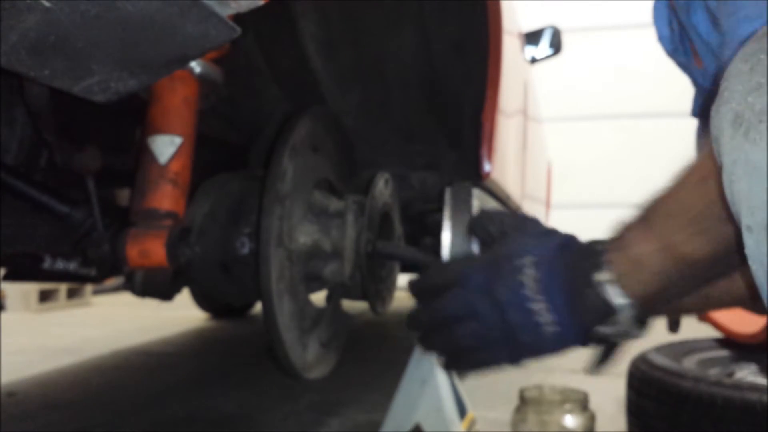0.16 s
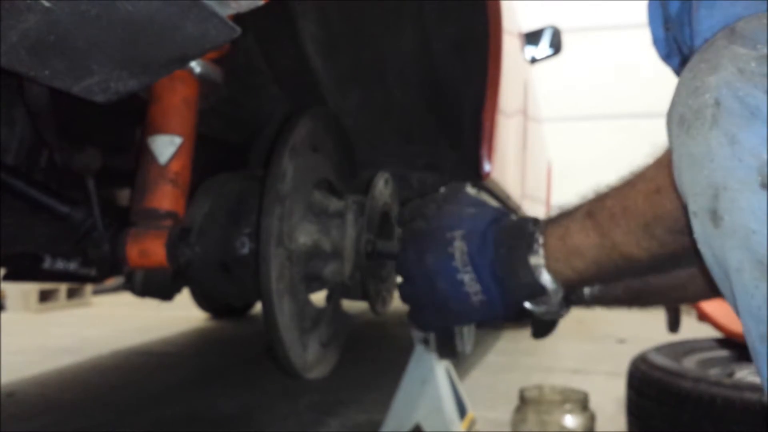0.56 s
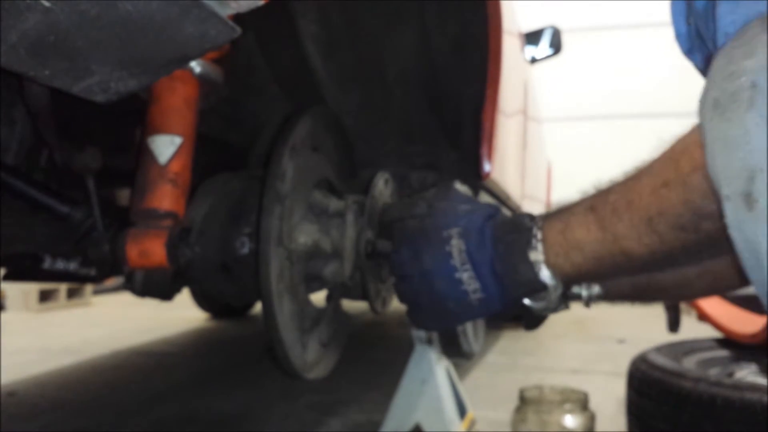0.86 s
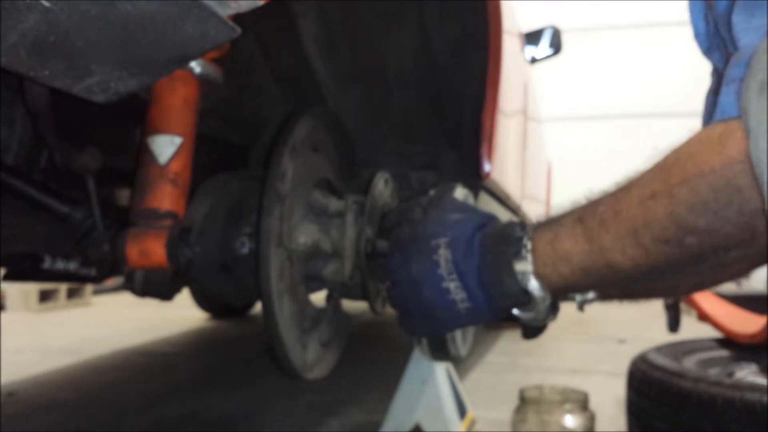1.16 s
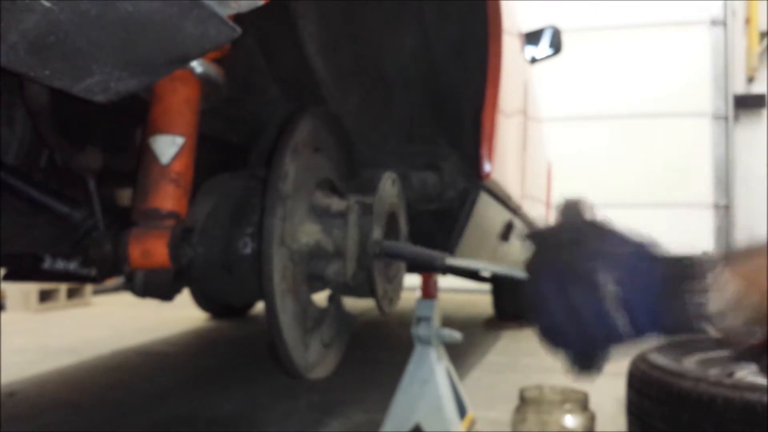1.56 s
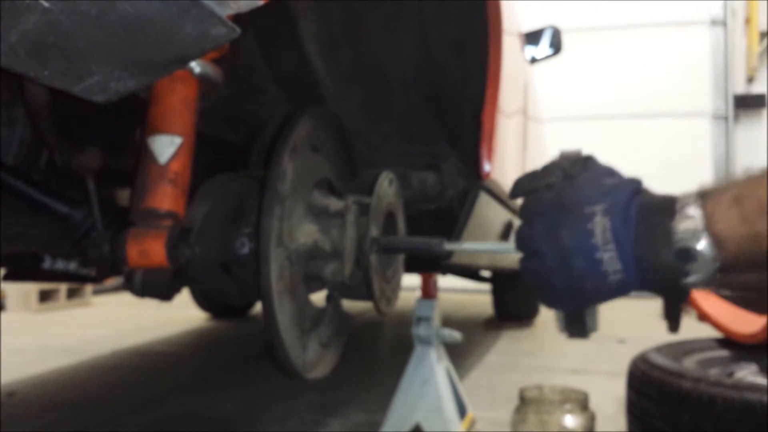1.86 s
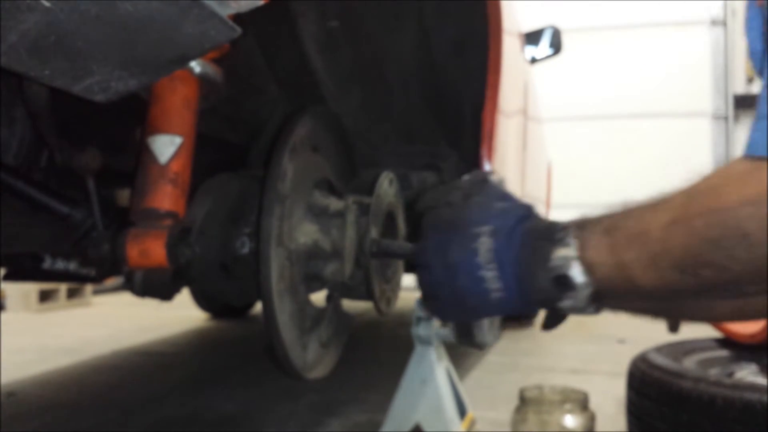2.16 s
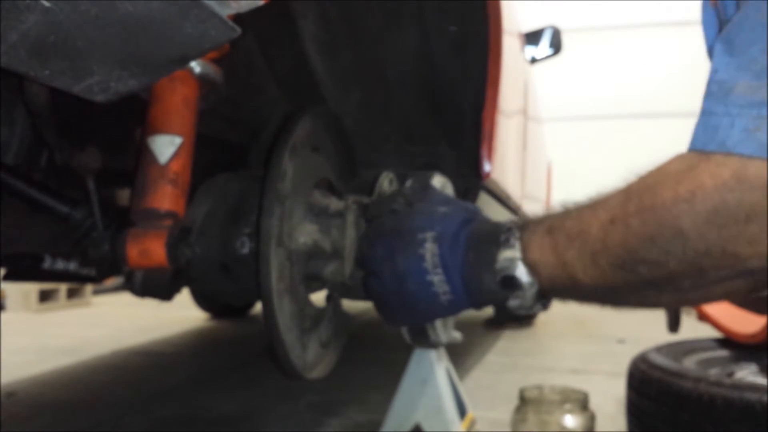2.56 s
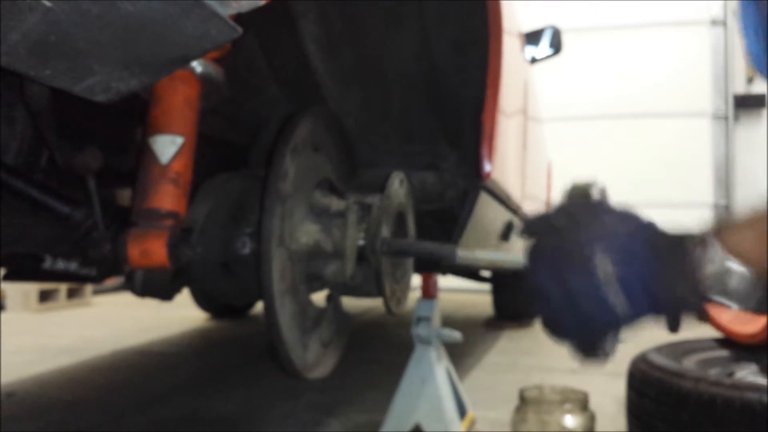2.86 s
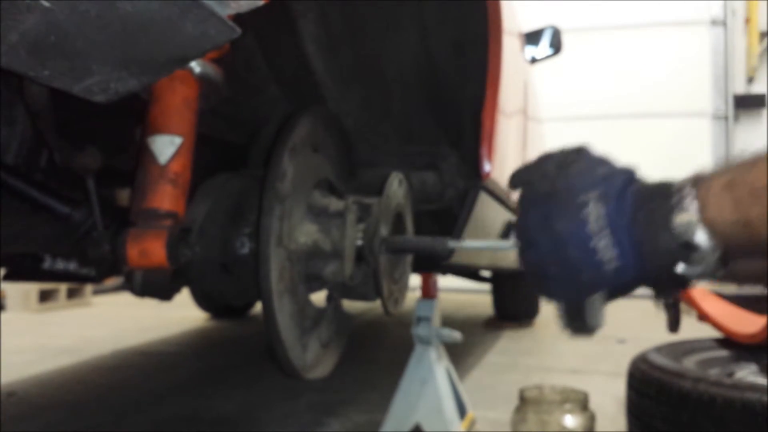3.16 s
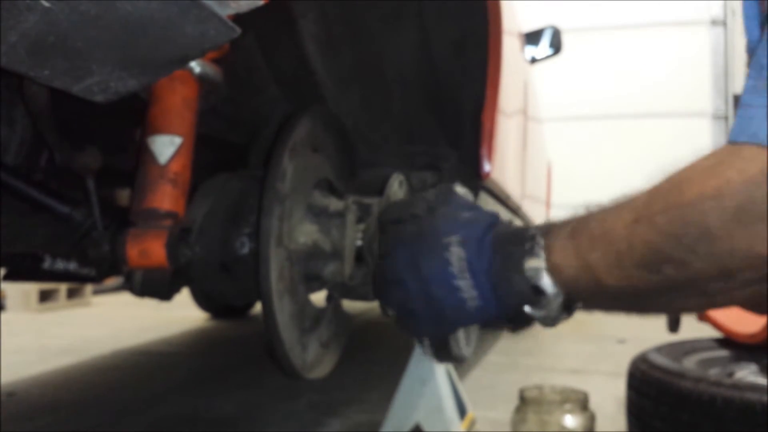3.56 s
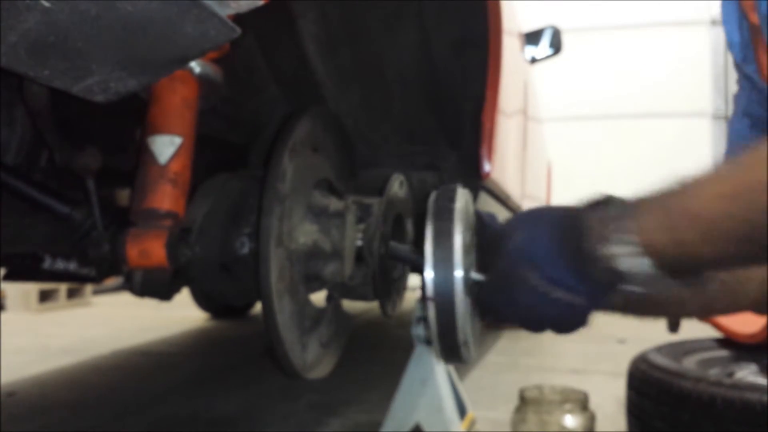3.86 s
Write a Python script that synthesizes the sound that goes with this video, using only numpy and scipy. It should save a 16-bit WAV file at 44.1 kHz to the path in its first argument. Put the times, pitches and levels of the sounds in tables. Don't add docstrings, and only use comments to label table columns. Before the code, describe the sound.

Two violent, overloaded metal-on-metal slide hammer blows, with squeaky rod scraping between them, ringing hub and boomy garage reverberation.

```python
import sys
import numpy as np
from scipy import signal
from scipy.fft import rfft, irfft, next_fast_len
from scipy.io import wavfile
from scipy.ndimage import uniform_filter1d

SR = 44100
rng = np.random.default_rng(int(sys.argv[2]) if len(sys.argv) > 2 else 0)


def dump_mix(stems):
    frames = np.atleast_2d(stems).T
    limited = np.clip(frames, -1, 1)
    pcm = np.round(limited * 32767).astype(np.int16)
    wavfile.write(sys.argv[1], SR, pcm)


def makeup_ratio(level_db):
    decades = np.asarray(level_db, float) / 20
    return 10 ** decades


N = 177634
LEAD = SR // 2

# frequency in Hz, width in Hz, level in dB.
ROD = [(1413.6, 26, -15.5), (3207, 58, -13.5), (4724, 35, -6), (4946, 47, -10), (5500, 120, -17),
       (6534, 60, -0.5), (7617, 45, -0.5), (8548, 36, -2.5), (9940, 8.6, 0.5), (10960, 35, -11),
       (13526, 44, -12.5), (13880, 29, -24.5), (14000, 39, -26.5), (13900, 23, -19.5)]


def evened(x):
    return x / np.sqrt(np.mean(x ** 2) + 1e-20)


def read(points, hz):
    f, value = np.transpose(points)
    return np.interp(np.log(hz + 1), np.log(f + 1), value)


def colour(x, points, scale=1):
    size = next_fast_len(x.shape[-1])
    gain = makeup_ratio(scale * read(points, np.fft.rfftfreq(size, 1 / SR)))
    return irfft(rfft(x, size) * gain, size)[..., :x.shape[-1]]


def resonate(x, hz, width_hz):
    pole = np.exp((2j * np.pi * hz - np.pi * width_hz) / SR)
    return 2 * signal.lfilter([1 - abs(pole)], [1, -pole], x + 0j).real


def drift(size, span_s):
    span = int(span_s * SR)
    return evened(uniform_filter1d(uniform_filter1d(rng.standard_normal(size), span), span))


def alike(hz, like):
    return like + (.98 - like) / (1 + (hz / 560) ** 3)


def pair(size, like):
    a, b = rfft(rng.standard_normal((2, size)))
    same = np.clip(alike(np.fft.rfftfreq(size, 1 / SR), like), -1, 1)
    return irfft([a, same * a + np.sqrt(1 - same ** 2) * b], size)


def add(mix, s, sound, pan_db=0):
    part = mix[:, LEAD + round(s * SR):][:, :sound.shape[-1]]
    panned = sound * makeup_ratio(np.array([[pan_db / 2], [-pan_db / 2]]))
    part += panned[:, :part.shape[1]]


def add_both(near, sent, s, sound):
    add(near, s, sound)
    add(sent, s, sound * makeup_ratio(-3.5))


def shock(shape):
    x = pair(len(shape), 0.24) * shape
    for _ in range(4):
        z = rfft(x)
        x = irfft(z / (abs(z) + 1e-12), len(shape))
        x = x * shape / np.sqrt(abs(uniform_filter1d(x ** 2, 48)) + 1e-24)
    return x


def blow(strength_db, rise_s, spectrum, ring):
    ring_db = -5
    t = np.arange(SR // 2) / SR
    t60_s = 0.07 * makeup_ratio(0.1 * strength_db) + 4.4 * rise_s
    hold_s = .015 * makeup_ratio(0.2467 * strength_db)
    onset = np.minimum(t / rise_s, 1)
    burst = shock(makeup_ratio(-60 * np.maximum(t - hold_s, 0) / t60_s) * onset)
    modes = sum(makeup_ratio(db) * resonate(burst * onset, hz, 2 * width_hz) for hz, width_hz, db in ring)
    crunch = colour(burst, spectrum) * onset
    sound = evened(crunch) + makeup_ratio(ring_db) * evened(modes)
    return makeup_ratio(strength_db) * 0.0867 * sound * np.minimum(1, 10 - 20 * t)


def boom(strength_db):
    # frequency in Hz, t60 in seconds, level in dB.
    body = [(52.1, 0.27, -6.5), (78, 0.35, -13), (99.8, 0.3, -6), (149.9, 0.65, -3.5), (173, 0.55, -9),
            (255.7, 0.23, -1), (274.3, 0.57, -13)]
    level_db = -28.5 + 1.4341 * min(strength_db, -4.5)
    t = np.arange(SR) / SR
    push = rng.standard_normal(SR) * makeup_ratio(-60 * t / 0.81) * np.minimum(t / 0.033, 1)
    panels = 0
    for hz, t60_s, db in body:
        panel = evened(resonate(push, hz, 0.9 / t60_s + 16))
        panels = panels + makeup_ratio(db) * panel * makeup_ratio(-30 * t / t60_s)
    return makeup_ratio(level_db) * evened(panels)[None] * np.ones((2, 1))


def blows(near, sent):
    # start in seconds, strength in dB, rise in seconds, left-right in dB, echo in dB.
    impacts = [
        (-.28, -3.5, 0.00286, 4.5, 0.5),
        (1.101, -39, 0.01594, 1, -1.5),
        (1.6455, -24.5, 0.0047, -0.5, -35.5),
        (1.6945, 3, 0.00512, 2.5, -3.5),
        (2.9826, -6.5, 0.0009, 2.5, 3),
        (3.671, -28.5, 0.0035, 1, -2),
    ]
    # frequency in Hz, level in dB per Hz.
    early = [(59, -28.5), (100, -8), (199, 2), (356, -13.5), (575, -12.5), (665, -65), (1100, -21),
             (2420, -8.5), (3590, -42.5), (6300, -4.5), (14500, -89)]
    scuff = [(88, -31.5), (150, -4.5), (216, -11), (270, 1), (355, -9), (494, -1.5), (1460, -14.5),
             (1850, -19.5), (12000, -39.5), (15600, -78), (22000, -120)]
    click = [(230, -29.5), (330, -5.5), (1010, -16.5), (1380, -4.5), (4020, -16), (8630, -6.5), (9360, -21),
             (14500, -21.5)]
    first = [(71, -38.5), (120, -19.5), (238, -6.5), (300, -20), (420, 0.5), (719, -11.5), (828, -3.5),
             (915, -14), (1070, -6), (4480, -11), (5590, -2), (10400, -22.5), (14700, -47.5)]
    second = [(71, -34.5), (120, -13.5), (162, -9), (810, -11.5), (890, -20), (1100, -5.5), (1200, -13.5),
              (2770, -11.5), (3540, -17.5), (5070, -11.5), (5780, -4.5), (10200, -20.5), (11000, -45),
              (14300, -55), (22000, -120)]
    clunk = [(120, -26), (200, -1), (714, -13), (824, -9), (1490, -11.5), (3160, -22), (4360, -32.5),
             (5510, -16), (8470, -25), (10900, -46), (14500, -35)]
    # frequency in Hz, width in Hz, level in dB.
    early_ring = [(1093, 39, 0), (1575, 4.7, 4.5), (1837, 133, -2), (2430, 120, -26), (3913, 20, -10),
                  (5533, 23.3, 5.5), (5674, 35, -1.5), (6310, 36, 5.5), (7780, 20, -22.5), (10020, 52, 2.5)]
    scuff_ring = [(475, 28, 0.5), (1110, 52, -9.5), (1870, 46, -5.5), (2250, 100, -12), (2570, 30, -10.5),
                  (6800, 90, -14.5)]
    click_ring = [(1306, 35, -6), (5570, 30, -3.5), (6700, 40, -5), (7100, 46, -5.5), (8660, 23, 3),
                  (10100, 44, -18.5), (11000, 38, -16.5), (12400, 23, -26), (13800, 55, -14)]
    first_ring = [(245, 67, -7), (422.3, 27, 2), (606, 8.8, -9.5), (814.8, 6.9, 0), (1061, 26, 0.5),
                  (1290, 13, -14), (1980, 35, -7), (3117, 140, -4), (3750, 49, -12), (4180, 51, -18.5),
                  (4500, 41, -21), (4670, 19, -14), (5270, 20, -6), (5720, 19, -0.5), (6310, 100, 0.5),
                  (7105, 220, -3.5), (8600, 46, -23), (9943, 83, -21), (9900, 31, -21.5),
                  (10100, 44, -18.5), (10950, 30, -28)]
    second_ring = [(175, 79, -16), (1910, 70, -10.5), (2820, 110, -22), (3020, 220, -15.5),
                   (3598, 16, -17.5), (3650, 9.7, -15.5), (4403, 51, -12), (5000, 18, -16), (5664, 18, 4.5),
                   (6230, 28, -6.5), (7140, 41, -13.5), (7600, 28, -10.5), (8000, 120, -12),
                   (8900, 17, -26), (9750, 31, -25.5), (10100, 61, -17.5)]
    clunk_ring = [(299.2, 25, -17), (419, 30.8, 6), (573, 35, 4), (803, 11.7, 4.5), (950, 52, -5.5),
                  (2097, 89, -3), (3080, 42, -14.5), (5300, 23.5, -5), (5530, 20, -7.5), (6600, 44, -9.5),
                  (10200, 17, -29.5), (11820, 31, -9.5)]
    spectra = [early, scuff, click, first, second, clunk]
    rings = [early_ring, scuff_ring, click_ring, first_ring, second_ring, clunk_ring]
    for (s, strength_db, rise_s, pan_db, echo_db), spectrum, ring in zip(impacts, spectra, rings):
        hit = blow(strength_db, rise_s, spectrum, ring)
        add(near, s, hit, pan_db)
        add(sent, s, hit * makeup_ratio(echo_db), pan_db)
        add_both(near, sent, s, boom(strength_db))


def garage(x):
    # frequency in Hz, t60 in seconds.
    decay = [(60, 0.81), (250, 0.6147), (1000, 0.7273), (4000, 0.689), (7000, 0.6005), (10000, 0.44),
             (15000, 0.13)]
    taps = np.zeros((2, SR))
    at = np.arange(200, SR - 16, 16) + rng.integers(0, 16, (2, (SR - 201) // 16))
    np.put_along_axis(taps, at, rng.choice([-1., 1.], at.shape), 1)
    hz, t, z = signal.stft(taps, SR, nperseg=512)
    same = np.clip(alike(hz, 0.044), -1, 1)[:, None]
    z = np.array([z[0], same * z[0] + np.sqrt(1 - same ** 2) * z[1]])
    tail = signal.istft(z * makeup_ratio(-60 * t / read(decay, hz)[:, None]), SR, nperseg=512)[1]
    return signal.fftconvolve(x, tail / np.linalg.norm(tail[0]), axes=1)[:, :x.shape[1]]


def ping(hz, db, rise_s, t60_s):
    t = np.arange(SR // 2) / SR
    rocking = min(1, 1.08 / t60_s) ** 3
    sway = rocking * drift(len(t), .009)
    main = np.sin(2 * np.pi * hz * t + [[0], [1.2]] + 0.51 * sway[::-1])
    twin = 0.23 * rocking * np.sin(2 * np.pi * (hz + 38) * t)
    level = makeup_ratio(db - 60 * t / t60_s + 2.6 * sway)
    return level * np.minimum(t / rise_s, 1) * (main + twin) * np.minimum(1, 10 - 20 * t)


def hum():
    # frequency in Hz, width in Hz, level in dB.
    hum_lines = [(56.1, 6, -67.5), (101.1, 5.8, -60.5), (121.86, 4.6, -56.5), (194.73, 1.6, -56)]
    total = 0
    for hz, width_hz, db in hum_lines:
        turns = np.cumsum(hz + 0.43 * width_hz * drift(N, 0.062)) / SR
        total = total + makeup_ratio(db + 2.0 + 2.1 * drift(N, 0.016)) * np.sin(2 * np.pi * turns)
    return total


def background():
    # time in seconds, gain in dB.
    slow_gain = [(0, 6.5), (.55, 3.5), (.8, -1.5), (1.7, 0.5), (2.25, 4), (2.55, -7), (2.849, -8), (3.5, 0),
                 (3.72, -4), (4.03, -9.5)]
    # frequency in Hz, level in dB per Hz.
    air_spectrum = [(20, -37.5), (40, -21), (100, -8.5), (200, -16), (300, -20.5), (600, -25.5),
                    (1400, -30), (3500, -34.5), (6500, -30.5), (9000, -38.5), (14700, -41)]
    # frequency in Hz, likeness from -1 to 1.
    likeness = [(60, 0.88), (180, 0.89), (530, 0.44), (1600, 0.33), (4770, -0.35), (14200, 0.48)]
    # frequency in Hz, share of the gain change.
    follows = [(300, .8), (650, 0.6), (1200, 1.4), (3500, 0.9), (12000, 0.92)]
    frames, hz = N // 256 + 5, np.fft.rfftfreq(1024, 1 / SR)
    a, b, c, d, patches = rng.standard_normal((frames, 513, 5)).T
    patches = evened(uniform_filter1d(uniform_filter1d(patches, 12, 0), 14, 1))
    same = np.clip(read(likeness, hz), -1, 1)[:, None]
    left = a + 1j * b
    z = np.array([left, same * left + np.sqrt(1 - same ** 2) * (c + 1j * d)])
    gain_db = np.interp(np.arange(frames * 256) / SR, *np.transpose(slow_gain))
    followed_db = read(follows, hz)[:, None] * gain_db[::256]
    z = z * makeup_ratio(read(air_spectrum, hz)[:, None] + 1.2 * patches + followed_db)
    air = makeup_ratio(-53.5) * evened(signal.istft(z, nperseg=1024, noverlap=768)[1][:, :N])
    return air + hum() * makeup_ratio(0.96 * gain_db[:N])


def stroke(length_s, sing_db, swell_db, scrape_db):
    # frequency in Hz, level in dB per Hz.
    scrape_spectrum = [(60, -18), (130, -0.5), (200, -14.5), (300, -10.5), (388, -15.5), (515, -1),
                       (594, -6), (3890, -10.5), (6580, -8.5), (9000, -13), (11700, -34), (19800, -120)]
    bite_s, let_go_s, judder_db = 0.17 * length_s, 0.013, 3
    t = np.arange(0, length_s, 1 / SR)
    blur = 1.7 * makeup_ratio(-0.2648 * scrape_db)
    catches = makeup_ratio(2.0 * rng.exponential(1, len(t))) * (rng.random(len(t)) < 1500 / SR)
    grit = pair(len(t), 0.19) * (2.1 + uniform_filter1d(catches, 60) * 20)
    sing = 0
    for hz, width_hz, db in ROD:
        fed = grit * makeup_ratio(db + 4.1 * drift(len(t), 0.032)) / np.sqrt(blur)
        sing = sing + resonate(resonate(fed, hz, blur * width_hz), hz, 3.4 * blur * width_hz)
    sound = evened(sing) + makeup_ratio(scrape_db) * evened(colour(grit, scrape_spectrum))
    contact = np.minimum(np.minimum(t / bite_s, (length_s - t) / let_go_s), 1)
    pressure_db = swell_db * t / length_s + judder_db * drift(len(t), 0.014)
    return sound * contact * makeup_ratio(sing_db + pressure_db)


def knock(peak_db, hz, bright_db, t60_s):
    rise_s = 0.051 * t60_s
    t = np.arange(SR // 6) / SR
    bump = pair(len(t), 0.25) * makeup_ratio(-60 * t / t60_s) * np.minimum(t / rise_s, 1)
    thud = resonate(resonate(bump, hz, 450), hz, 450)
    tick = sum(makeup_ratio(.5 * db) * resonate(bump, f, 5 * width_hz) for f, width_hz, db in ROD)
    return makeup_ratio(peak_db) * (thud / abs(thud).max() + makeup_ratio(bright_db) * tick / abs(tick).max())


def mode(hz, db, rise_s, t60_s):
    t = np.arange(SR // 2) / SR
    port_phase = np.array([[0], [1]]) * 0.8 * (1 - alike(hz, 0))
    swell = np.sin(np.pi / 2 * np.minimum(t / rise_s, 1)) ** 2
    level = makeup_ratio(db - 60 * np.maximum(t - rise_s, 0) / t60_s) * swell
    return level * np.sin(2 * np.pi * hz * t + port_phase) * np.minimum(1, 10 - 20 * t)


def skid(length_s, level_db, swell_db, spectrum):
    t = np.arange(0, length_s, 1 / SR)
    catches = makeup_ratio(3.0 * rng.exponential(1, len(t))) * (rng.random(len(t)) < 900 / SR)
    grit = colour(pair(len(t), 0.19) * (1.4 + uniform_filter1d(catches, 40) * 15), spectrum)
    contact = np.minimum(np.minimum(t / 0.0023, (length_s - t) / 0.0066), 1)
    return evened(grit) * contact * makeup_ratio(level_db + swell_db * t / length_s)


def scene():
    # start in seconds, frequency in Hz, level
    # in dB, rise and t60 in seconds.
    pings = [(-.05, 5645, -49.5, .004, 1.44), (0.201, 1300, -51, 0.07, 0.91),
             (1.15, 576, -47.5, 0.036, 0.298), (1.7, 10227, -42, .004, 0.825),
             (1.7, 10150, -45.5, .004, .7), (1.7, 13110, -39.5, 0.0036, 0.482),
             (2.1, 1370, -55.5, .15, 1.34), (2.983, 5646, -20, .001, 0.47), (2.985, 5661, -25, .002, 0.4),
             (1.6466, 5570, -30.5, 0.0019, 0.058), (2.985, 13200, -34.5, 0.0034, 0.25),
             (2.984, 10100, -35.5, 0.0028, 0.68), (2.984, 10170, -42, .003, 0.667),
             (3.676, 13900, -68.5, .004, 0.58), (3.74, 3742, -60.5, 0.054, 1.9),
             (3.84, 14000, -63, .02, 0.66), (3.585, 205, -49.5, 0.023, 0.236),
             (3.995, 185, -52.5, .012, 0.28)]
    # start and length in seconds, singing of the rod in dB,
    # swell over the stroke in dB, dull scrape against singing in dB.
    strokes = [(0.102, 0.282, -79.5, 7, 16.5), (0.363, 0.2363, -72, -2.5, 16),
               (1.447, 0.1616, -74.5, 0, 13.5), (1.618, 0.0428, -64, 20.5, 8), (1.98, 0.215, -56, 2.5, -7),
               (2.15, 0.3516, -49, -6.5, -4), (2.481, 0.18, -65.5, -26.5, -13.5),
               (2.887, 0.0963, -36.5, 12.5, -11.5), (3.37, 0.3067, -50.5, -5, -0.5),
               (3.957, 0.074, -52.5, -6.5, -2)]
    # start in seconds, peak in dB, thud pitch
    # in Hz, bright part in dB, t60 in seconds.
    knocks = [(0.378, -45.5, 1263, -15.5, 0.124), (.57, -46, 802, -9, 0.12), (1.098, -43, 950, -20, 0.042),
              (1.112, -40.5, 1137, -8.5, 0.059), (1.113, -51.5, 2794, -4, 0.038),
              (1.12, -44.5, 1898, -11.5, 0.128), (1.514, -42, 1297, -20.5, 0.072),
              (1.696, -7, 3080, -3, 0.036), (2.9637, -13, 3287, 8, 0.012), (2.9832, -2.5, 6023, -5, 0.0214),
              (2.896, -37, 2107, 2.5, 0.151), (3.553, -40, 1110, -15.5, 0.1),
              (3.579, -41.5, 1385, -1.5, 0.05), (3.959, -46.5, 3010, -6, 0.063),
              (3.9641, -48.5, 3100, 6.5, .03), (3.978, -38.5, 3418, 4.5, 0.012),
              (3.991, -43, 3514, 7, 0.017)]
    # start in seconds, frequency in Hz, level in dB, rise and t60 in seconds.
    hub = [(1.112, 465, -47, .012, .25), (1.125, 580, -50, .02, .3), (1.7, 239, -22.5, .055, .5),
           (1.696, 425, -18, .008, .2), (1.72, 434, -27, .05, .6), (1.697, 1050, -22, .006, .12),
           (1.697, 800, -23, .006, .12), (1.72, 170, -27, .05, .55), (1.7, 550, -28, .02, .5),
           (1.7, 612, -30, .02, .7), (1.7, 811, -24, .02, .75), (1.7, 1064, -29, .02, .7),
           (1.7, 1241, -28, .02, .5), (1.7, 1896, -32, .02, .7), (1.79, 76, -31, .055, .3),
           (2.984, 178, -21.5, .012, .14), (3.035, 166, -23.5, .025, .15), (2.984, 505, -29, .008, .2),
           (3.08, 75, -28.5, .05, .2), (3.0, 278, -31, .03, .35), (3.09, 232, -31, .035, .25),
           (2.986, 12500, -39, .004, .22), (3.15, 165, -35, .035, .3), (3.672, 398, -38.5, .006, .33),
           (3.672, 544, -39.5, .006, .27), (3.672, 807, -40, .004, .38), (3.6715, 960, -36, .002, .07),
           (3.672, 690, -41, .004, .15), (3.675, 300, -42, .01, .25), (3.674, 3150, -47, .004, .12),
           (3.672, 2130, -45, .003, .08)]
    # start and length in seconds, level in dB, swell in dB.
    skids = [(2.883, .009, -45.5, 1.5), (2.893, 0.0596, -42, 8.5), (2.947, .036, -25.5, 3),
             (3.958, .042, -50, 8.5), (4.0, .03, -58.5, 0)]
    # frequency in Hz, level in dB per Hz.
    rasp = [(200, -22.5), (2400, -15.5), (4000, -12), (5900, -10.5), (8200, -1), (10200, -14), (12100, -32),
            (13900, -11.5), (14700, -31)]
    # frequency in Hz, level in dB per Hz.
    rasp_slow = [(200, -16.5), (680, -20.5), (1390, -4.5), (2500, -18), (3100, -12), (4300, -8.5),
                 (6540, 3), (9000, -10), (14700, -43.5)]
    # frequency in Hz, left-right in dB.
    ports = [(60, 0), (180, -1), (530, 1), (1600, 0), (4770, 5), (14200, -6)]
    near, sent = np.zeros((2, 2, N + LEAD))
    blows(near, sent)
    for s, *shape in pings:
        add_both(near, sent, s, ping(*shape))
    for s, *shape in strokes:
        add_both(near, sent, s, stroke(*shape))
    for s, *shape in knocks:
        add_both(near, sent, s, knock(*shape))
    for s, *shape in hub:
        add(near, s, mode(*shape))
    for s, *shape in skids:
        add_both(near, sent, s, skid(*shape, rasp if s < 2.9826 else rasp_slow))
    steel = near + garage(sent)
    steel = np.array([colour(steel[0], ports, 0.68), colour(steel[1], ports, -0.69)])
    return steel[:, LEAD:] + background()


def thinned(x, margin_db):
    hz, t, z = signal.stft(x, SR, nperseg=1024)
    power = abs(z) ** 2
    loud = power[:, (hz > 1000) & (hz < 8000)].mean(1, keepdims=True)
    bands = np.repeat(power[:, :512].reshape(2, 64, 8, -1).max(2), 8, 1)
    masked = (bands < loud * makeup_ratio(2 * margin_db)) & (hz[:512, None] > 8900)
    keep = np.pad(~masked, [(0, 0), (0, 1), (0, 0)])
    return signal.istft(z * keep, SR, nperseg=1024)[1][:, :N]


def top_cut(x):
    return signal.sosfilt(signal.butter(12, 14840, fs=SR, output="sos"), x)


def record(dry):
    lag = np.exp(-1 / (0.016 * SR))
    power_db = 10 * np.log10(signal.lfilter([1 - lag], [1, -lag], (dry ** 2).mean(0)) + 1e-12)
    fall_db = np.arange(N) * 260.0 / SR
    held_db = np.maximum.accumulate(power_db + fall_db) - fall_db
    over_db = np.maximum(held_db + 14.5, 0)
    slow = np.exp(-1 / (0.0077 * SR))
    ducked = dry / makeup_ratio(0.621 * signal.lfilter([1 - slow], [1, -slow], over_db))
    limited = signal.oaconvolve(ducked, signal.firwin(255, 14800, fs=SR)[None], "same")
    return top_cut(np.clip(thinned(limited, -11), -1, 1))


dry = scene()
out = record(dry)
dump_mix(out)
```